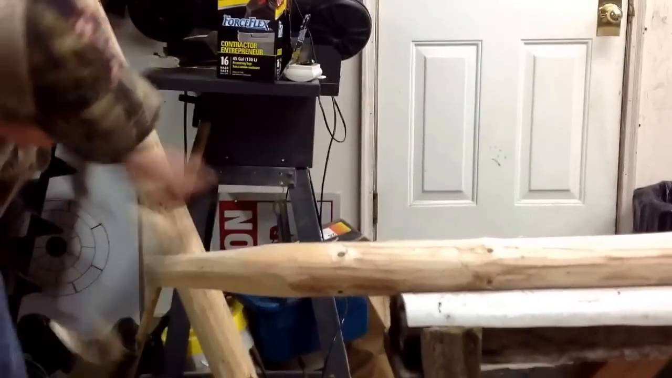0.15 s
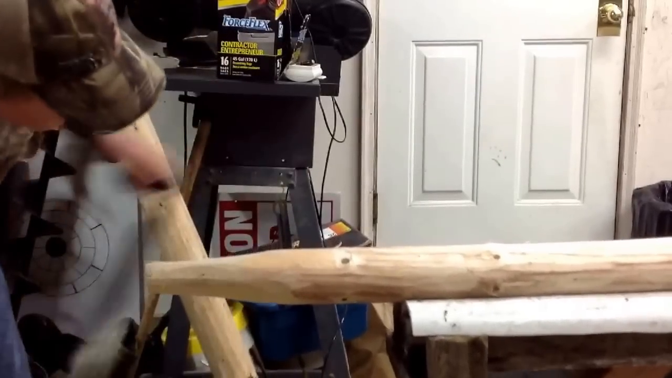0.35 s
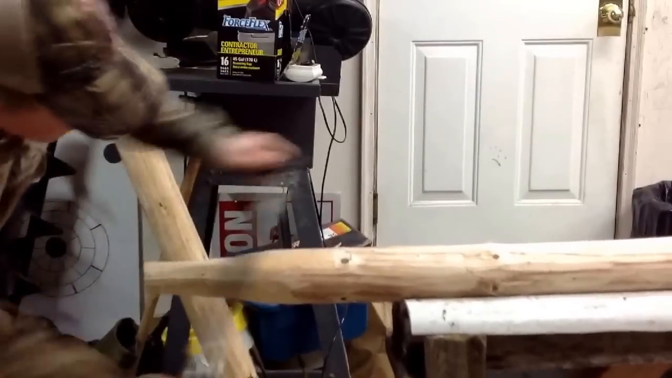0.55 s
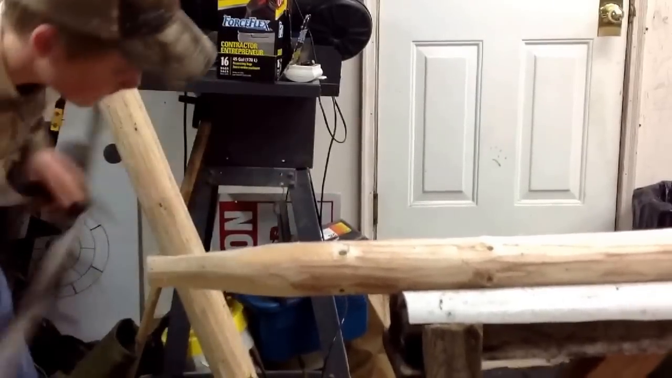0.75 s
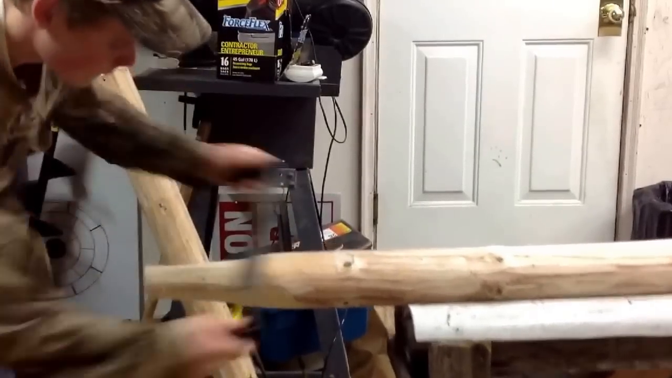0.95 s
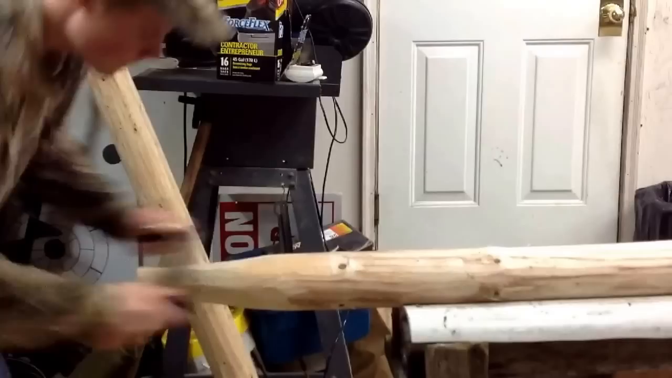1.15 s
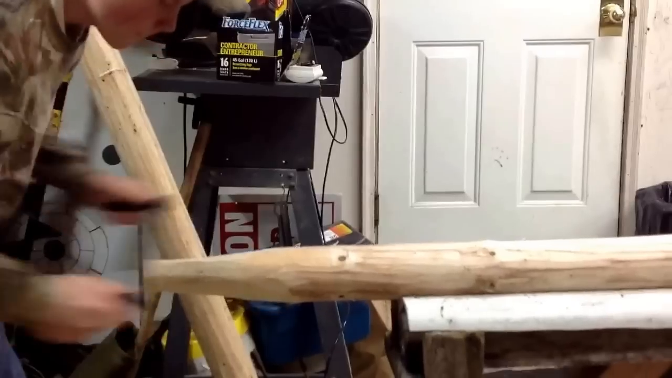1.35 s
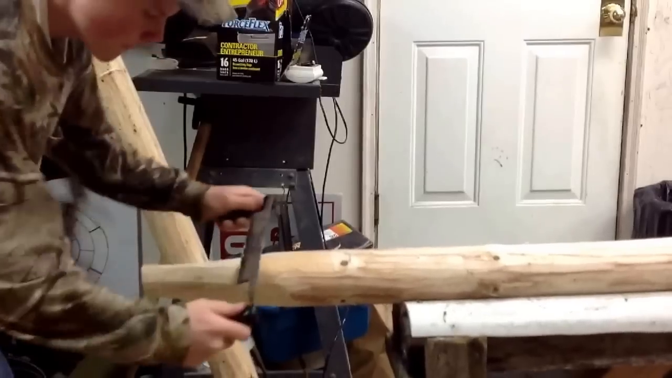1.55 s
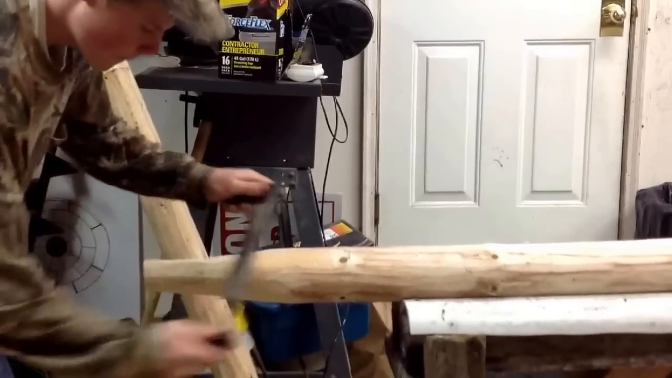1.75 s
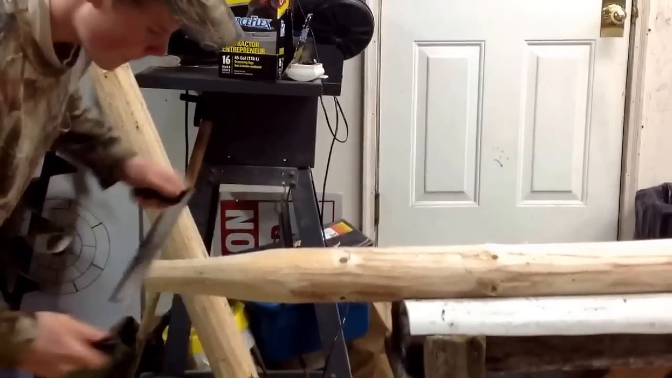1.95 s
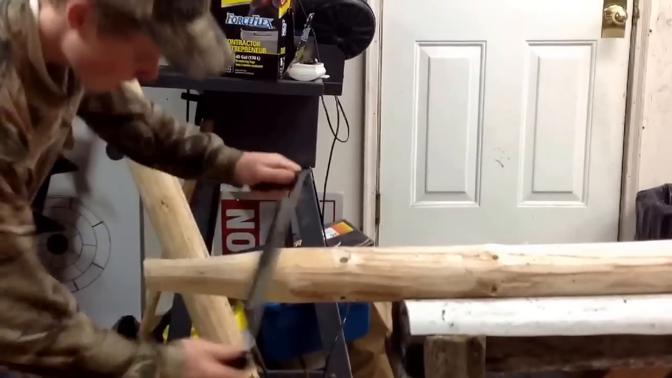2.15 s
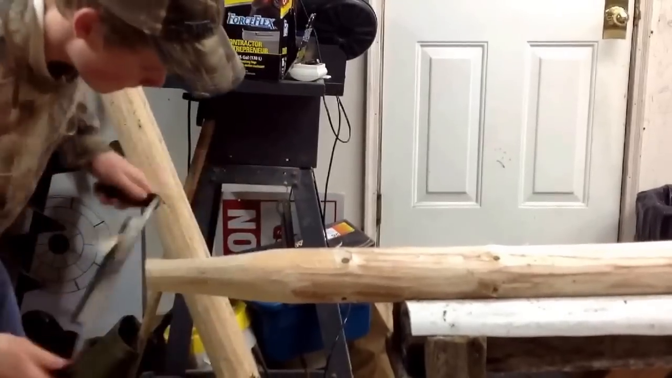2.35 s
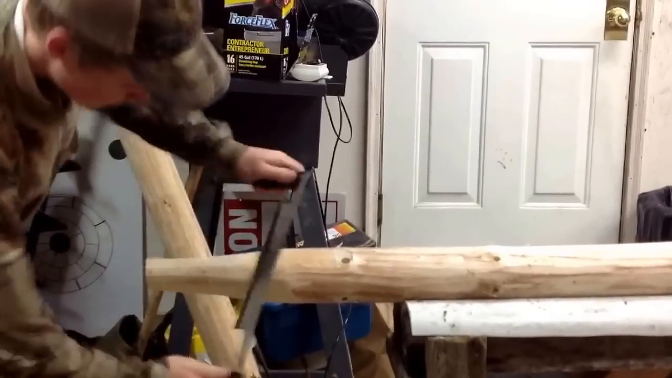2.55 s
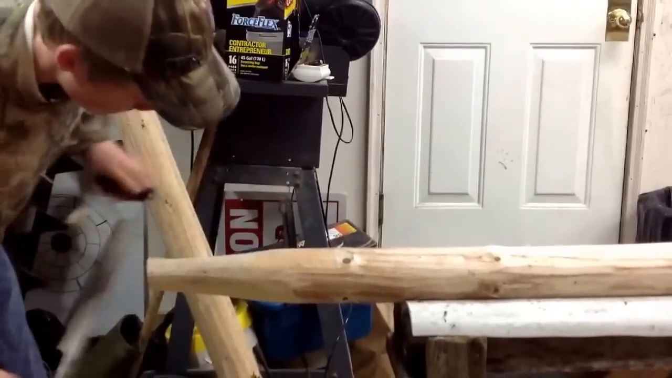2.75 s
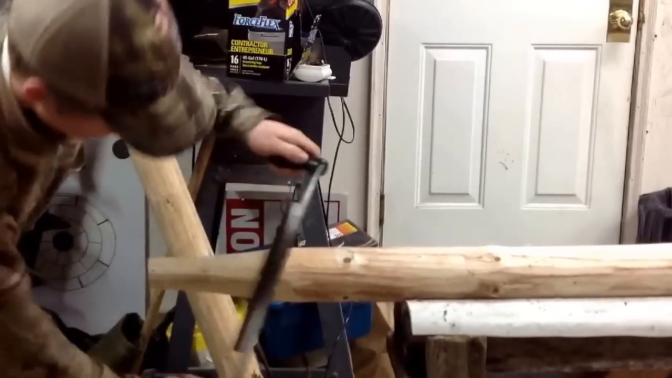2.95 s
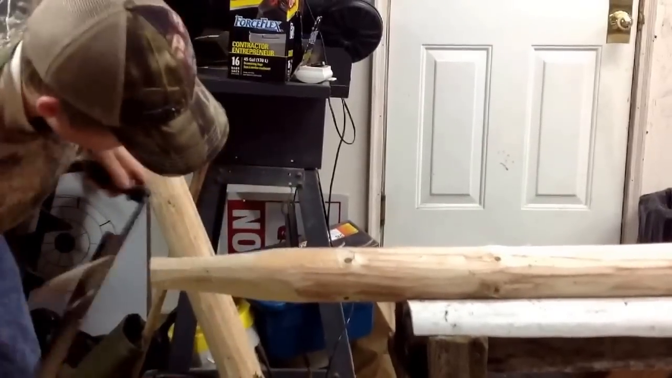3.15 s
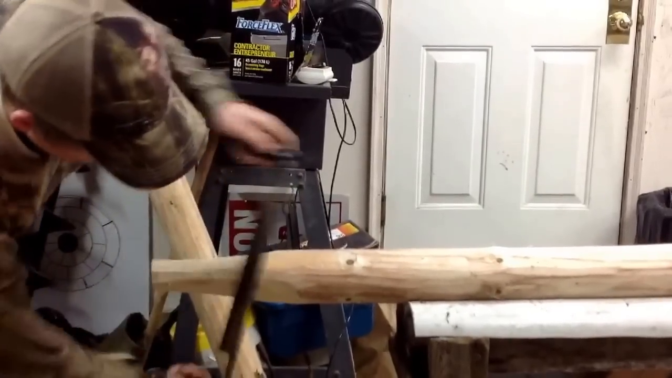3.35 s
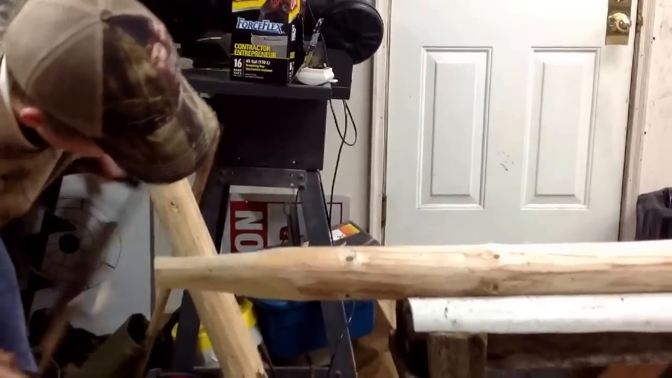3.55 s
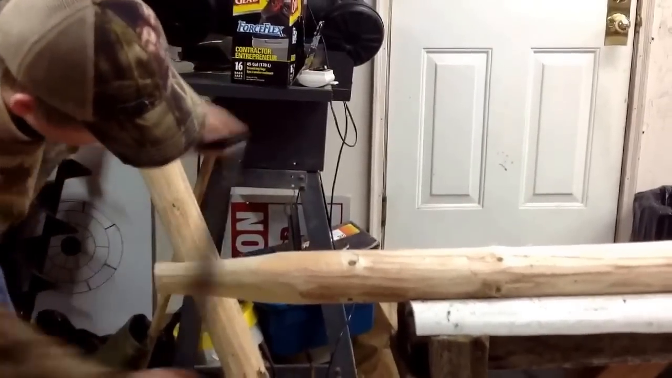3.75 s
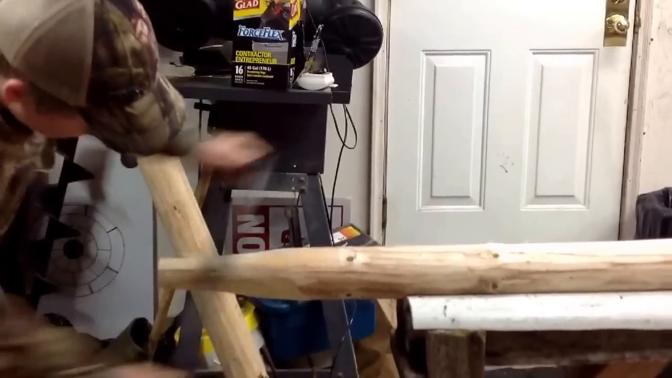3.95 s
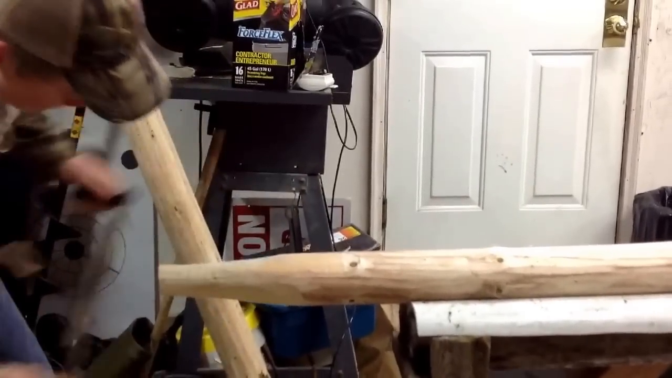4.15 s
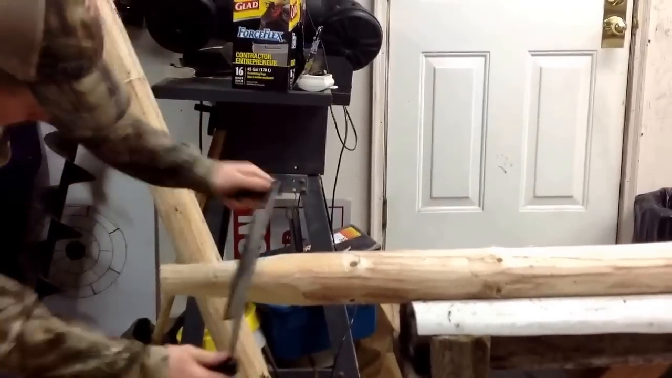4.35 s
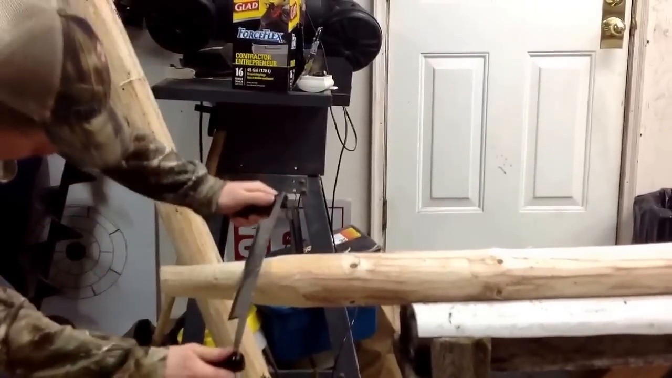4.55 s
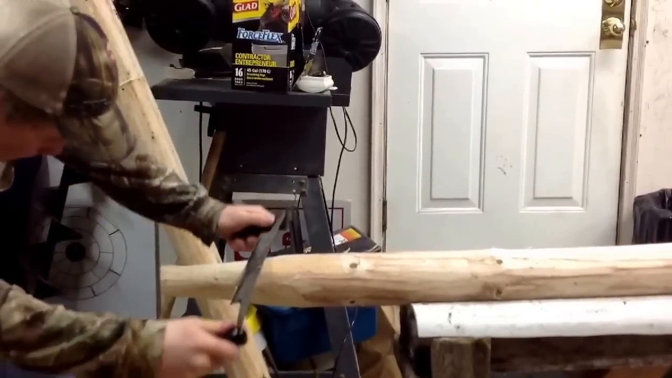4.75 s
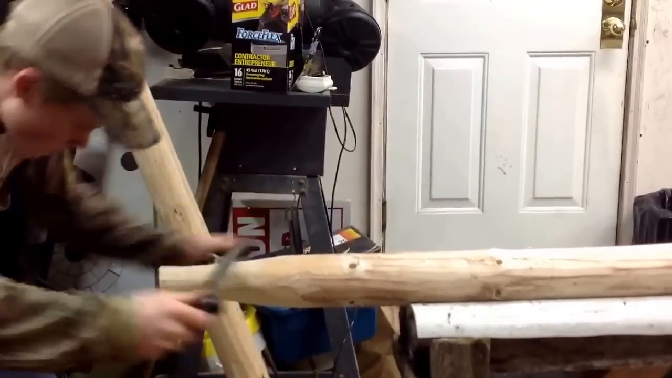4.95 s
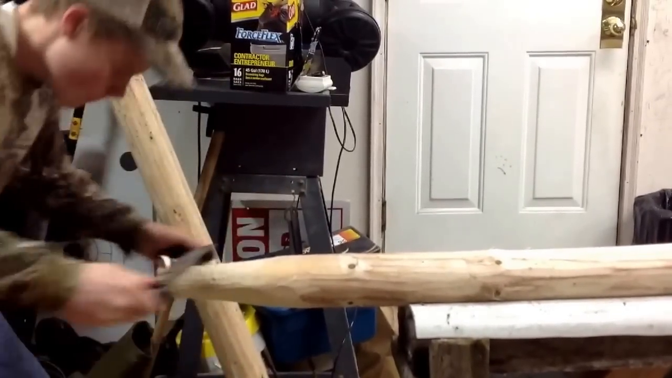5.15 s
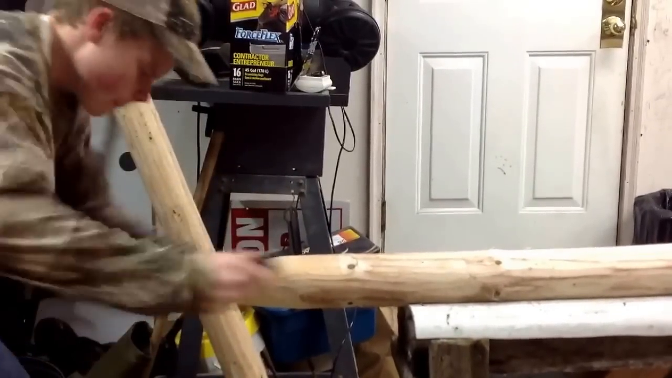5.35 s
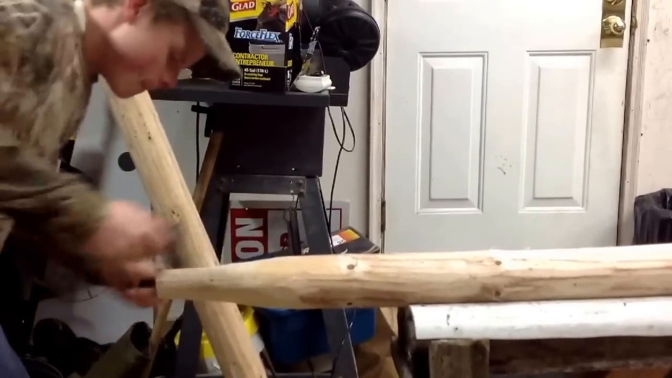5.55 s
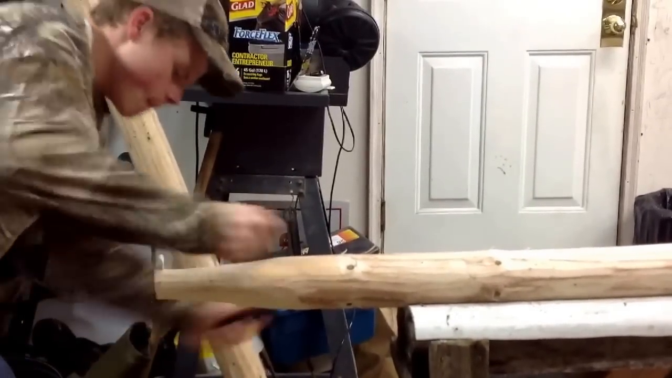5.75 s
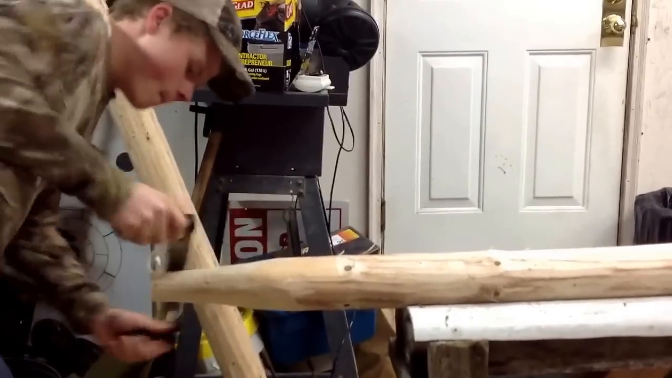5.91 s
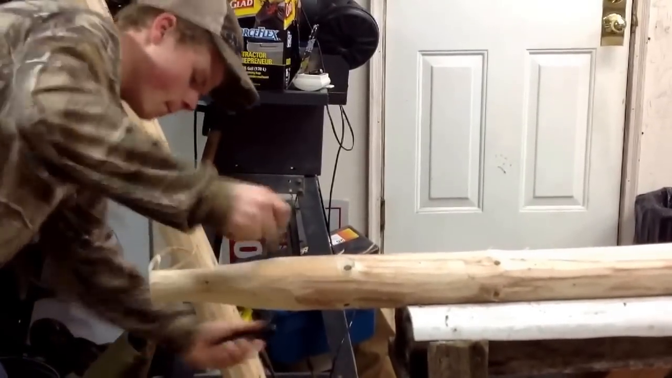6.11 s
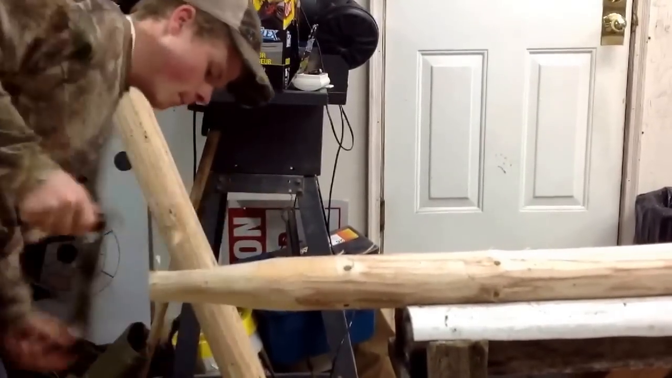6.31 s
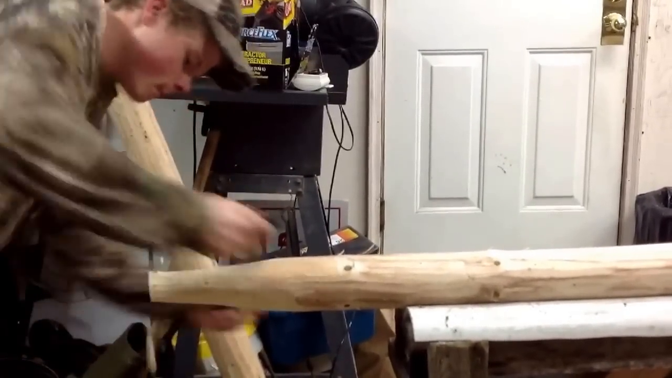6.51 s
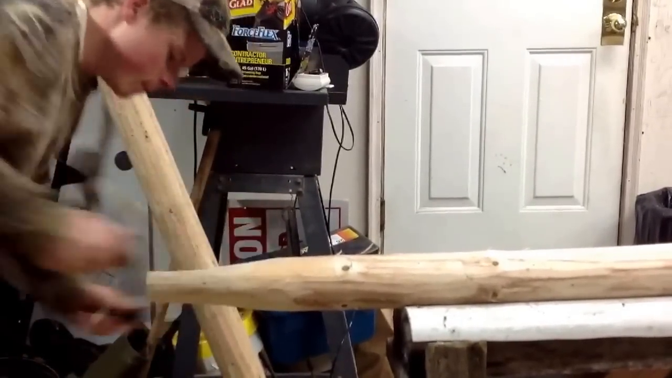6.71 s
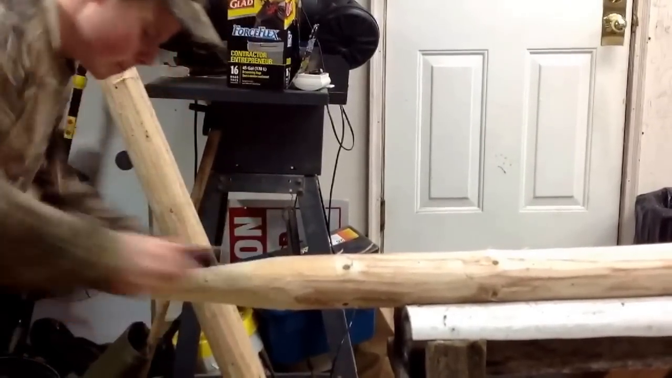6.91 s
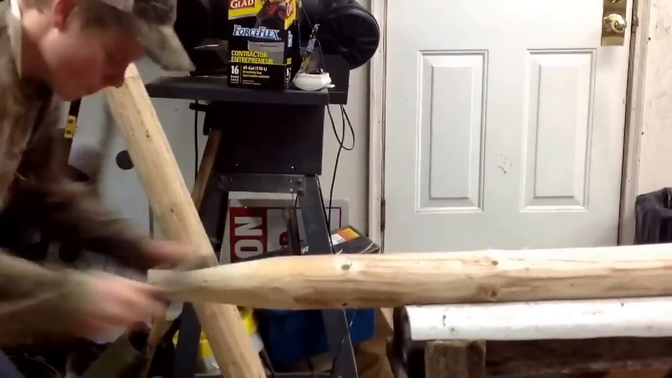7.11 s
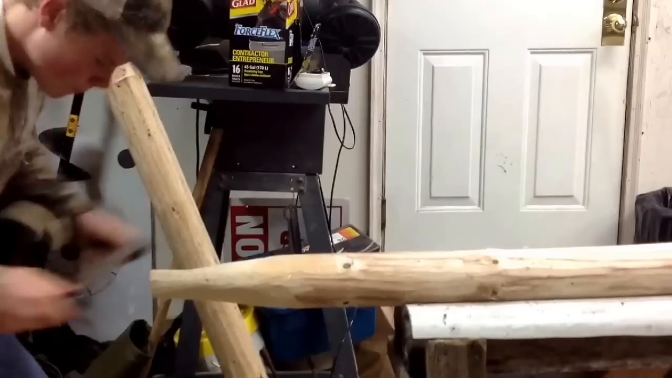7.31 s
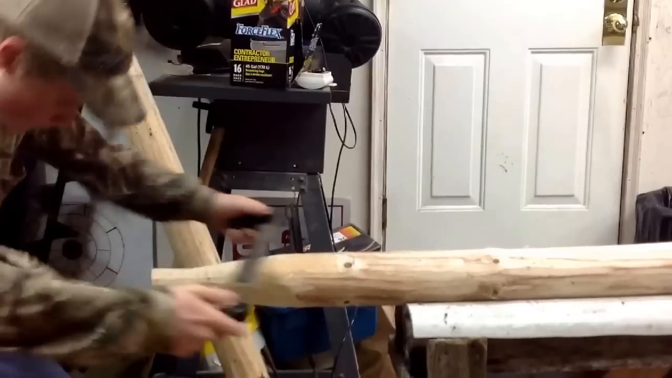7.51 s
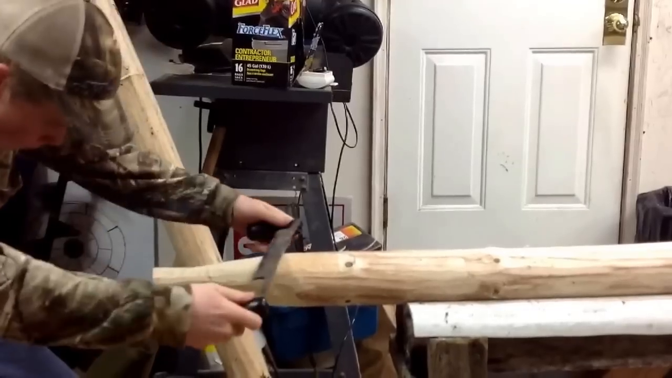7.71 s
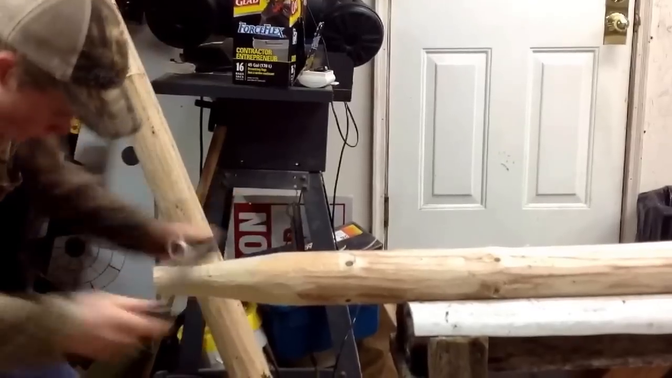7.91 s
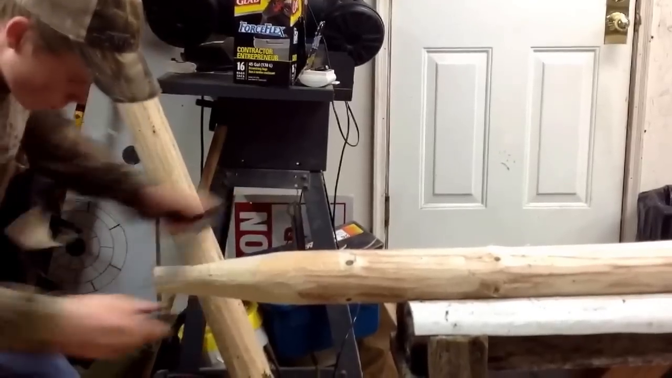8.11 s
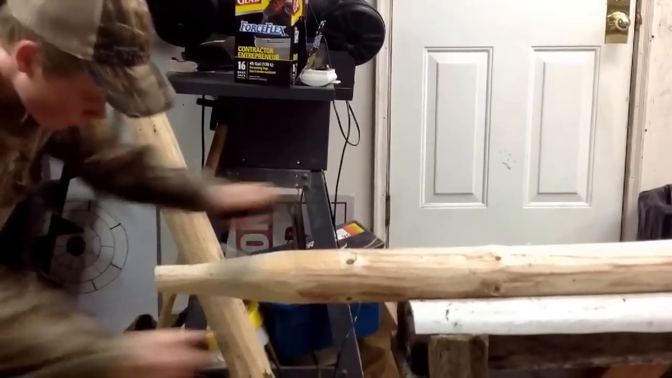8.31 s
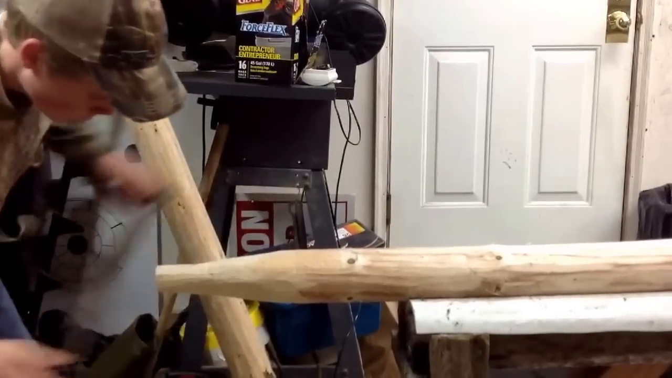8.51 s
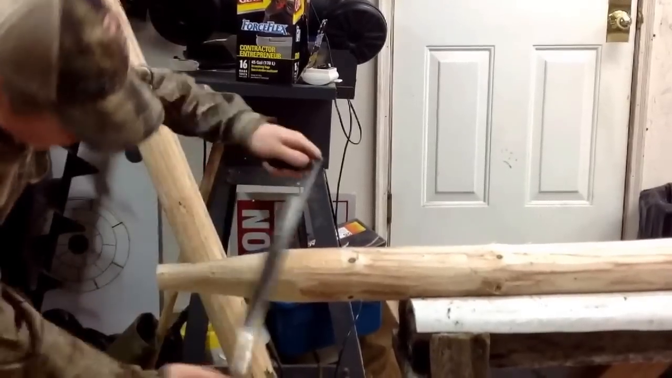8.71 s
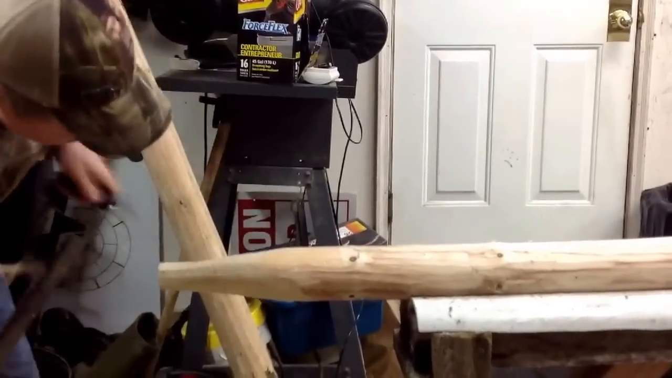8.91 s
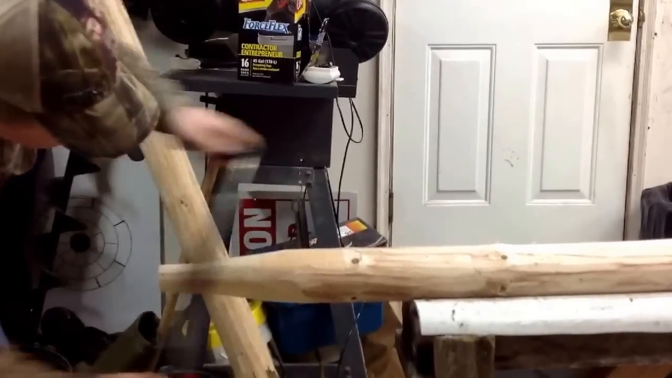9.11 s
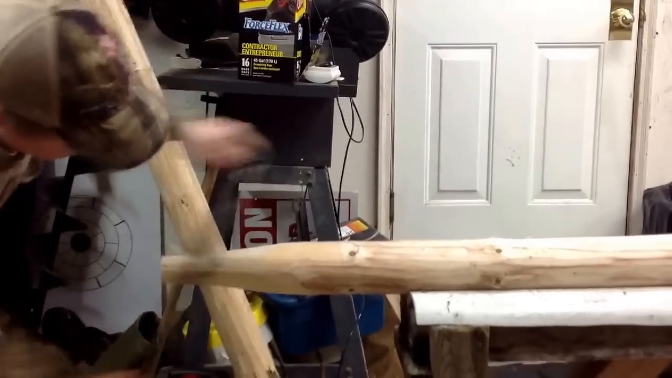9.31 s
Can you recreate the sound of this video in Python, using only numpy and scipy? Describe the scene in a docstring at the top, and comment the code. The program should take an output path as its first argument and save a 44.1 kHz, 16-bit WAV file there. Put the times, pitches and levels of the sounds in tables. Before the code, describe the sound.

Repeated crisp shaving strokes on resonant wood, the first strong, the next few softer, then uneven and fuller again. Between them come blunt hollow knocks, low thumps, light taps of falling chips and slight blade squeaks. Brief pauses occur before and after the middle and late in the run. A small nearby microphone with thin bass catches a short room reverberation and low steady background air.

```python
"""A bright rasp over the hollow voice of a log: a drawknife shaves its end, about two strokes a second.
Random fibre breaks, shaped by each pull, drive the log's resonances and the rasp and hiss of the edge.
Knocks, bumps, dull thumps, splinters and chips are sharp pushes with a short crunch, coloured by filters.
Resonated noise makes brief squeaks of the blade, short woody bursts and a broad tearing hiss.
Cloth and shavings rustle, the workshop rings and quiet air lies below."""
import sys
import numpy as np
from scipy import signal
from scipy.fft import rfft, irfft, next_fast_len
from scipy.io import wavfile
from scipy.ndimage import uniform_filter1d

SR = 44100
rng = np.random.default_rng(int(sys.argv[2]) if len(sys.argv) > 2 else 0)


def int16_out(signal):
    """Quantize to a 16-bit WAV file."""
    q = np.round(np.clip(np.atleast_2d(signal).T, -1, 1) * 32767)
    wavfile.write(sys.argv[1], SR, q.astype(np.int16))


N = 413216  # length in samples

# Event and spectrum levels are relative; most layers have a further gain.
# pulls of the knife: start_s, sink_s, full_depth_s, push_db, tear_db, hiss_db, mid_cut_pitch_hz
STROKES = [ (0.03, 0.058, 0.016, -21, -22, -19.5, 734), (0.51, 0.064, 0.033, -28, -31, -30, 750),
           (1.005, 0.033, 0.1, -32, -38, -35.5, 710), (1.72, 0.068, 0.064, -33.5, -40.5, -36.5, 746),
           (2.165, 0.032, 0.073, -28.5, -33.5, -32, 780), (2.565, .062, 0.038, -26, -33, -31.5, 698),
           (2.97, 0.076, 0.019, -23.5, -27.5, -28, 810), (3.395, 0.065, 0.028, -26.5, -35, -38.5, 740),
           (3.875, 0.08, 0.047, -28.5, -34, -35, 790), (4.256, 0.012, 0.01, -34.5, -26, -32, 655),
           (4.895, .05, .12, -30.5, -38.5, -41, 620), (5.348, .035, 0.069, -22, -28, -26, 640),
           (5.742, 0.024, 0.083, -23, -30.5, -24.5, 680), (6.115, 0.049, 0.083, -24.5, -30, -34.5, 666),
           (6.595, 0.049, 0.05, -22.5, -27, -25, 667), (7.055, 0.04, 0.055, -22.5, -27, -24.5, 880),
           (7.84, 0.08, 0.025, -23, -25, -27, 700), (8.275, 0.038, 0.069, -28, -32, -34.5, 850),
           (8.745, 0.045, .045, -23.5, -25, -33, 650), (9.255, 0.062, .04, -22, -27.5, -26.5, 740), ]
# shape of push, tearing and hiss in a pull: first_touch_db, full_depth_drift_db_per_s, release_db_per_s
PUSH_SHAPE = (-22, 20, -420)
TEAR_SHAPE = (-23, -24.5, -480)
HISS_SHAPE = (-28.5, -6.5, -650)
SINK_CURVE = 0.98  # 1 sinks in evenly in dB; above 1 is fast at first, then eases
TOUCH_S, RELEASE_S = 0.011, 0.1  # first contact; time allowed for the shaving to come free
PITCH_RISE_PER_S = 1.1  # exponential rate: the wood rings higher as the blade nears the end of the log

# resonances of the log: pitch_hz, width_hz, lift_db
LOG_MODES = [(154, 4, 13), (264, 9.4, 2.5), (424, 32, 4), (582.5, 33, 8.5), (697, 15, 3.5), (790, 72, 5),
             (920, 22, -2.5), (937, 90, 6), (1121.3, 10, 8), (1100, 18, 2.5), (1346, 30, 12.5),
             (1440, 120, 2), (1662, 16, 5.5), (2186, 37, 12), (2424, 44, 5.5)]
# spectra of the log, the tearing and the edge: frequency_hz, density_db_per_hz
WOOD_SPECTRUM = [(30, -46.5), (90, -22.5), (150, -9.5), (250, -3), (370, -5.5), (560, 2.5), (800, 0.5),
                 (1050, -4.5), (1400, -7), (1750, -8), (2300, -16), (3500, -20), (8000, -23)]
RASP_SPECTRUM = [(100, -30.5), (1200, -11.5), (2200, 4.5), (3000, -1), (4200, 2.5), (6000, -0.5),
                 (8000, -9.5), (14000, -25.5)]
HISS_SPECTRUM = [(2000, -46), (5000, -14), (7000, 1), (8500, 0), (11000, 0), (14000, -3.5), (16000, -8.5)]

# the blade lands, digs in, or knocks and skids on the log: start_s, thud_db, edge_click_db, woody_bite_db
KNOCKS = [(0.502, -32.5, -40.5, -43), (0.581, -23, -25, -21.5), (1.246, -25, -45, -35),
          (1.451, -21.5, -36, -36), (2.145, -27, -38, -29), (2.546, -30.5, -40, -34.5),
          (2.964, -20.5, -41, -20.5), (3.066, -34, -35, -13.5), (3.386, -21, -30.5, -45),
          (3.883, -26.5, -43, -45), (4.211, -34, -27, -32), (5.267, -25, -42, -38),
          (5.702, -27, -45.5, -25), (6.087, -33.5, -31, -61), (6.216, -23.5, -30, -14),
          (6.557, -25.5, -38, -29), (6.652, -19, -39, -12.5), (7, -30.5, -49, -44),
          (8.247, -33.5, -41, -57), (8.711, -23, -33, -23.5), (9.254, -18.5, -27, -31)]
# the knife bumps the log on its way back: start_s, knock_db, low_sway_db
BUMPS = [(0.296, -25.5, -28), (0.903, -25, -28.5), (1.47, -26, -25.5), (3.621, -24, -26),
         (4.099, -36, -30.5), (4.348, -27.5, -47), (8.971, -24.5, -29)]
# dull low thumps of the log, some following a pull or bump: start_s, level_db
THUMPS = [(0.004, -33), (1.306, -37), (1.666, -34), (3.194, -34), (4.39, -45), (6.02, -39), (6.44, -38.5),
          (7.568, -42.5), (9.186, -37.5)]
# spectra of log thud, edge click, bite, bump and dull lows: frequency_hz, density_db_per_hz
LANDING_SPECTRUM = [(40, -47.5), (120, -13.5), (200, -12.5), (280, 2), (360, -11.5), (470, -3),
                    (700, -10.5), (1000, -18.5), (3000, -39.5), (8000, -51.5)]
CLICK_SPECTRUM = [(100, -1.5), (1300, 7), (2400, 8), (4000, 4.5), (8000, 1), (15000, -5)]
BITE_SPECTRUM = [(300, -21), (750, 5.5), (1100, 7.5), (1400, 5.5), (1900, -8.5), (2400, -3), (3000, -11),
                 (6000, -40.5)]
THUD_SPECTRUM = [(40, -32), (120, -8.5), (250, -1), (480, -10.5), (630, -4.5), (950, -18.5), (1500, -27),
                 (3000, -33.5), (8000, -42)]
DULL_SPECTRUM = [(40, -40), (95, -23), (140, -2.5), (185, 4.5), (260, -9), (400, -11), (900, -20),
                 (3000, -48.5)]

# brief squeaks of the blade, short woody bursts and a broad tearing hiss:
# start_s, length_s, pitch_hz, width_hz, level_db
RESONANT_BURSTS = [(0.507, .095, 7680, 120, -49), (2.249, 0.03, 1380, 298, -28.5),
                   (2.565, 0.077, 4130, 700, -43), (2.582, 0.04, 7560, 120, -44),
                   (3.059, 0.022, 5900, 900, -28), (3.386, 0.045, 7600, 120, -50),
                   (3.48, 0.019, 3370, 700, -37.5), (3.905, 0.084, 7660, 90, -44),
                   (3.988, 0.028, 1340, 80, -34), (5.335, 0.085, 2480, 200, -39.5),
                   (6.221, 0.026, 713, 298, -12.5), (7.053, .039, 2460, 199.4, -47),
                   (7.942, 0.047, 6300, 2820, -23.5), (8.313, .023, 4100, 220, -37),
                   (8.365, 0.034, 1260, 452, -27.5), (8.729, 0.13, 7620, 110, -38.5)]
# splinters break under the edge: start_s, level_db
SNAPS = [(0.0868, 2.5), (0.098, 2.5), (0.1014, -9), (1.803, -14), (2.2515, 1.5), (3.043, -6), (3.0535, 1),
         (3.468, -8.5), (3.994, -11.5), (5.0632, -14), (6.215, -9.5), (7.928, -4), (7.942, -4),
         (8.3737, -10), (8.818, -24), (9.3297, -5)]
# chips land: start_s, level_db
CHIPS = [(0.409, -32.5), (0.9612, -31.5), (1.2793, -35), (2.7925, -28), (3.698, -36.5), (3.784, -33.5),
         (6.8579, -31.5), (7.33, -30), (7.378, -32.5), (7.712, -33.5), (8.554, -28.5), (9.127, -39)]
# spectrum of a splinter: frequency_hz, density_db_per_hz
CRACK_SPECTRUM = [(500, -30), (2000, -14.5), (5000, -7.5), (8500, 3.5), (12000, -1), (16000, 0)]

# wide swings of the arms: centre_s, level_db
SWISHES = [(0.0, -55), (1.24, -56), (3.75, -68), (4.17, -59.5), (6.97, -66), (8.25, -65)]
SWISH_S, STIR_DB = 0.15, -64.5  # half-length of a swing; relative level of the constant stirring
# reverberation of the workshop: frequency_hz, t60_s
ROOM = [(150, 0.34), (530, 0.26), (1400, 0.3), (3700, .32), (9700, 0.27), (15000, 0.2)]
# spectrum of the quiet air: frequency_hz, density_db_per_hz
AIR_SPECTRUM = [(18, -73.5), (30, -18.5), (132, 12), (680, 4.5), (1240, -4), (1480, 3.5), (1690, -17),
                (2130, -8.5), (2430, -18), (4900, -8), (5440, -5), (8470, -5), (15000, -10.5)]
AIR_DB = -62
BAND_LIMIT_HZ = 15550


def shaving(judder_db=1.3, judder_per_s=170, rasp_db=-2, hiss_db=-2, wood_db=-4, hollow_db=-5,
            hollow_width_hz=380):
    """Fibres break along the moving edge; it catches and slips, shaking the log."""
    push, tear, hiss, pitch_hz = strokes()
    judder = unit(amp(judder_db * wander(judder_per_s)))

    wood_breaks = push * judder * fractures(per_s=1800, spread_db=2)
    wood = amp(wood_db) * colour(wood_breaks, WOOD_SPECTRUM, LOG_MODES)

    # the wood under the blade changes pitch as the cut moves along it
    hollow = resonate(fractures(per_s=1800, spread_db=-0.5), pitch_hz, hollow_width_hz)
    hollow = unit(resonate(hollow, pitch_hz, hollow_width_hz))
    hollow = amp(hollow_db) * push * judder * hollow

    torn_fibres = tear * judder * fractures(per_s=1700, spread_db=0.5)
    rasp = amp(rasp_db) * colour(torn_fibres, RASP_SPECTRUM)

    edge_breaks = hiss * judder * fractures(per_s=9000, spread_db=0.0)
    fizz = amp(hiss_db) * colour(edge_breaks, HISS_SPECTRUM)
    return wood + hollow, patchy(rasp + fizz, depth_db=3.5)


def strokes():
    """Push, tearing, hiss and pitch of the wood through all the pulls."""
    push, tear, hiss = np.zeros((3, N))
    pitch_hz = np.full(N, float(STROKES[0][-1]))
    for start_s, sink_s, hold_s, push_db, tear_db, hiss_db, mid_hz in STROKES:
        t = np.arange(0, sink_s + hold_s + RELEASE_S, 1 / SR)
        add(push, start_s, amp(push_db) * pull(t, sink_s, hold_s, *PUSH_SHAPE))
        add(tear, start_s, amp(tear_db) * pull(t, sink_s, hold_s, *TEAR_SHAPE))
        add(hiss, start_s, amp(hiss_db) * pull(t, sink_s, hold_s, *HISS_SHAPE))
        part = pitch_hz[round(start_s * SR):][:len(t)]
        from_mid_cut_s = t[:len(part)] - sink_s - hold_s / 2
        part[:] = mid_hz * np.exp(PITCH_RISE_PER_S * from_mid_cut_s)
    return push, tear, hiss, pitch_hz


def pull(t, sink_s, hold_s, touch_db, drift_db_per_s, fall_db_per_s):
    """Envelope of one pull: the edge touches, sinks in, cuts at full depth, and comes free."""
    touching = np.minimum(t / TOUCH_S, 1)
    sinking = touch_db * np.clip(1 - t / sink_s, 0, 1) ** SINK_CURVE
    cutting = drift_db_per_s * (np.clip(t - sink_s, 0, hold_s) - hold_s / 2)
    leaving = fall_db_per_s * np.maximum(t - sink_s - hold_s, 0)
    return touching * amp(sinking + cutting + leaving)


def patchy(x, depth_db):
    """Every bundle of fibres breaks with its own colour: smoothed random gains over time and pitch."""
    z = signal.stft(x, SR, nperseg=256)[2]
    patches = uniform_filter1d(rng.standard_normal(z.shape), size=7, axis=0)
    patches = uniform_filter1d(patches, size=4, axis=1)
    gains = unit(amp(depth_db * unit(patches)))
    return signal.istft(z * gains, SR, nperseg=256)[1][:N]


def knocks(thud_db=14, click_db=11, bite_db=14):
    """The blade lands, digs in, or knocks and skids: the log thuds, the edge clicks, the wood is bitten."""
    start_s, log_db, edge_db, woody_db = np.transpose(KNOCKS)
    thud = blows(start_s, log_db, crumble=2.7, crumble_s=0.039, rise_s=0.0054)
    thud = amp(thud_db) * colour(thud, LANDING_SPECTRUM, LOG_MODES)
    click = blows(start_s, edge_db, crumble=4.4, crumble_s=0.037, rise_s=0.0036)
    click = amp(click_db) * colour(click, CLICK_SPECTRUM)
    bite = blows(start_s, woody_db, crumble=1.48, crumble_s=0.0096)
    bite = amp(bite_db) * colour(bite, BITE_SPECTRUM, LOG_MODES)
    return thud + click + bite


def bumps(thud_db=15, sway_db=24, thump_db=6):
    """Blunt blows that sway the log, and dull low thumps of the log."""
    start_s, knock_db, low_db = np.transpose(BUMPS)
    thud = blows(start_s, knock_db, crumble=2.4, crumble_s=0.05)
    thud = amp(thud_db) * colour(thud, THUD_SPECTRUM, LOG_MODES)
    sway = blows(start_s, low_db, crumble=0.89, crumble_s=0.021)
    sway = amp(sway_db) * colour(sway, DULL_SPECTRUM, LOG_MODES)
    thumps = blows(*np.transpose(THUMPS), crumble=6.9, crumble_s=0.028, rise_s=0.018)
    thumps = amp(thump_db) * colour(thumps, DULL_SPECTRUM)
    return thud + thumps + bonk() + along_log(sway)


def bonk(peak_s=0.0025):
    """The first few cycles of a blunt blow: a compact woody knock."""
    out, t = np.zeros(N), np.arange(SR // 16) / SR
    swell = t / peak_s * np.exp(1 - t / peak_s)
    for start_s, knock_db, _ in BUMPS:
        pitch_hz = rng.uniform(478.4, 501.28)
        add(out, start_s, amp(knock_db) * swell * np.sin(2 * np.pi * pitch_hz * t))
    return out


def along_log(x, lag_s=0.0287, at_hz=200, slope=2.78, longest_s=0.07):
    """Low bending waves travel slowly through the log: the lower they are, the later they arrive."""
    size = next_fast_len(N + SR)
    hz = np.fft.rfftfreq(size, 1 / SR)
    # a power law through lag_s at at_hz, bending over smoothly towards longest_s in the bass
    delay_s = 1 / np.hypot((hz / at_hz) ** slope / lag_s, 1 / longest_s)
    phase = 2 * np.pi * np.cumsum(delay_s) * SR / size
    return irfft(rfft(x, size) * np.exp(-1j * phase), size)[:N]


def resonant_bursts(gain_db=-1):
    """Noise through one resonance: narrow ones squeak, wider ones give woody bursts or a tearing hiss."""
    out = np.zeros(N)
    for start_s, length_s, pitch_hz, width_hz, level_db in RESONANT_BURSTS:
        noise = rng.standard_normal(SR // 8)
        ringing = resonate(resonate(noise, pitch_hz, width_hz), pitch_hz, width_hz)
        burst = unit(ringing[-round(length_s * SR):])  # keep the end of the noise
        fade = signal.windows.tukey(len(burst), 0.5)
        add(out, start_s, amp(level_db + gain_db) * burst * fade)
    return out


def splinters(snap_db=2, chip_db=8):
    """Dry snaps of breaking fibre and light taps of falling chips, each a blow with a short crunch."""
    snaps = colour(blows(*np.transpose(SNAPS), crumble=1.4, crumble_s=0.002), CRACK_SPECTRUM)
    chips = colour(blows(*np.transpose(CHIPS), crumble=1.78, crumble_s=0.021), CLICK_SPECTRUM)
    return amp(snap_db) * snaps + amp(chip_db) * chips


def rustle():
    """Cloth and loose shavings stir, and swell when the arms swing wide."""
    t = np.arange(N) / SR
    swings = sum(amp(db) * np.exp(-((t - centre_s) / SWISH_S) ** 2) for centre_s, db in SWISHES)
    level = amp(STIR_DB) + swings
    return colour(level * fractures(per_s=4000, spread_db=-3.5), CLICK_SPECTRUM)


def workshop(x, wet_db, gap_s=0.0026, count=4):
    """Direct sound plus dense reflections, which change as the worker and blade move."""
    hz, t, z = signal.stft(rng.standard_normal((count, SR // 2)), SR, nperseg=256)
    decay = amp(-60 * t / read(ROOM, hz)[:, None])
    tails = signal.istft(z * decay, SR, nperseg=256)[1]
    tails = tails * (np.arange(tails.shape[1]) > gap_s * SR)
    # the blend of tails turns at one cycle a second
    turn = 2 * np.pi * np.arange(N) / SR
    wet = np.zeros(N)
    for k, tail in enumerate(tails):
        share = np.sqrt(2 / count) * np.cos(turn + np.pi * k / count)
        wet += signal.oaconvolve(x * share, tail / np.linalg.norm(tail))[:N]
    return x + amp(wet_db) * wet


def quiet_air():
    """Steady noise with the uneven spectrum of the quiet air."""
    return amp(AIR_DB) * unit(colour(rng.standard_normal(N), AIR_SPECTRUM))


def fractures(per_s, spread_db):
    """Random clicks of rms 1: a few stand out above 0 dB of spread, all match at 0, a few sink below it."""
    chance = rng.random(N)
    size = np.minimum(rng.exponential(1, N), 4)
    sign = rng.choice([-1, 1], N)
    return unit((chance < per_s / SR) * sign * amp(spread_db * size))


def blows(times_s, levels_db, crumble, crumble_s, rise_s=0.00044):
    """One sharp push for each event, with a short crunch of crushed fibres."""
    out, t = np.zeros(N), np.arange(SR // 6) / SR
    envelope = np.minimum(t / rise_s, 1) * np.exp(-t / crumble_s)
    for start_s, level_db in zip(times_s, levels_db):
        crunch = rng.standard_normal(len(t)) * envelope
        crunch = crumble * crunch / np.linalg.norm(crunch)
        add(out, start_s, amp(level_db) * ((t == 0) + crunch))
    return out


def colour(x, spectrum, modes=(), size=8192):
    """Causal filter of energy 1: a smooth spectrum with resonances standing out of it."""
    hz = abs(np.fft.fftfreq(size, 1 / SR))
    lifts = sum(lift / (1 + (2 * (hz - f) / width) ** 2) for f, width, lift in modes)
    gain = amp(read(spectrum, hz) + lifts)
    # minimum phase: the energy comes as early as the spectrum allows
    minimum_phase = np.exp(signal.hilbert(np.log(gain)).conj())
    response = np.fft.ifft(minimum_phase).real[:size // 2]
    return signal.oaconvolve(x, response / np.linalg.norm(response))[:N]


def resonate(x, hz, width_hz):
    """A resonance of gain 1 that can follow a pitch curve."""
    turn = np.exp(2j * np.pi * np.cumsum(hz * np.ones(len(x))) / SR)
    r = np.exp(-np.pi * width_hz / SR)
    # shift the pitch down to zero, smooth, and shift back
    smooth = signal.lfilter([1 - r], [1, -r], x / turn + 1e-18)
    return 2 * (turn * smooth).real


def wander(per_s):
    """Random curve of rms 1, straight between per_s new values a second."""
    knots = rng.standard_normal(N)
    return unit(np.interp(np.arange(N) * per_s / SR, np.arange(N), knots))


def amp(db):
    """Decibels to gain."""
    return 10 ** (np.asarray(db) / 20)


def unit(x):
    """Scales to rms 1."""
    return x / np.sqrt(np.mean(x ** 2) + 1e-20)


def read(points, hz):
    """Reads a table on a log-frequency axis."""
    f, value = np.transpose(points)
    return np.interp(np.log(hz + 1), np.log(f), value)


def add(mix, start_s, sound):
    """Mixes a sound in at its start time."""
    part = mix[max(round(start_s * SR), 0):][:len(sound)]
    part += sound[:len(part)]


def scene():
    """All of the work in the room, over quiet air."""
    wood, rasp = shaving()
    low = workshop(wood, wet_db=1.0) + workshop(knocks() + bumps(), wet_db=-5.0)
    high = workshop(rasp + resonant_bursts() + splinters() + rustle(), wet_db=-5.5)
    return (amp(-2.0) * low + high + quiet_air())[None]


def record(dry, low_cut_hz=48):
    """A small microphone: thin deep bass, the sharpest peaks rounded off, and a band limit."""
    thin = signal.sosfilt(signal.butter(3, low_cut_hz, "high", fs=SR, output="sos"), dry)
    rounded = thin / (1 + (thin / 0.8) ** 4) ** 0.25  # peaks stay below 0.8
    band_limit = signal.firwin(401, BAND_LIMIT_HZ, window=("kaiser", 9), fs=SR)
    return signal.oaconvolve(rounded, band_limit[None], "same")


dry = scene()
out = record(dry)
int16_out(out)
```